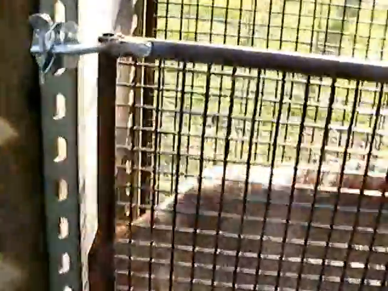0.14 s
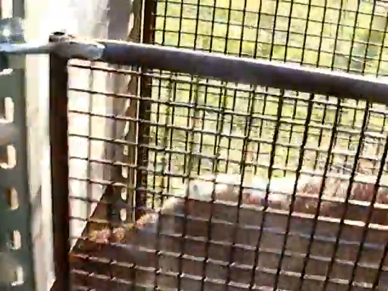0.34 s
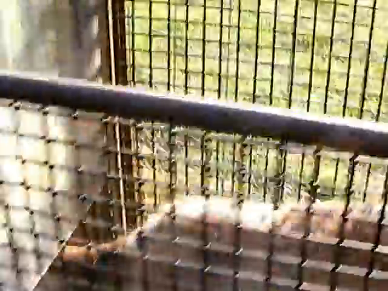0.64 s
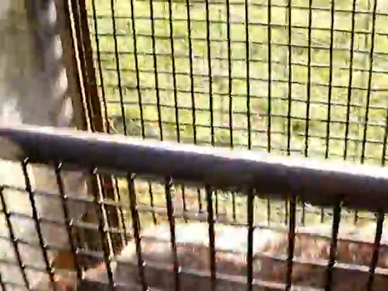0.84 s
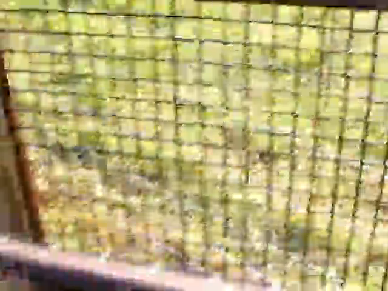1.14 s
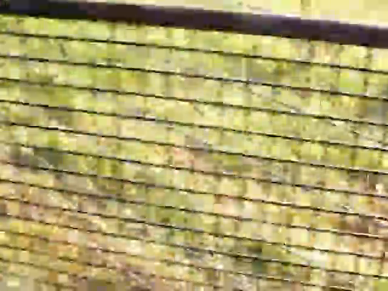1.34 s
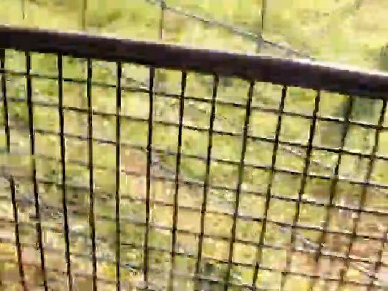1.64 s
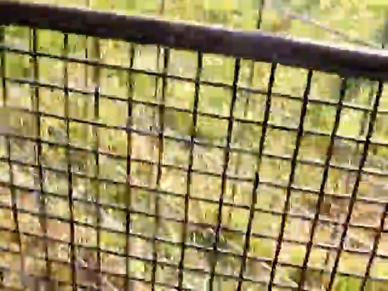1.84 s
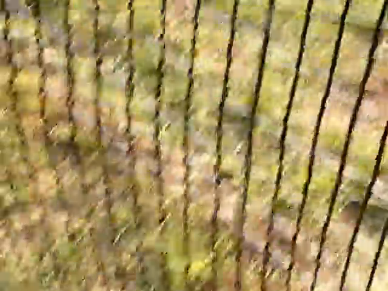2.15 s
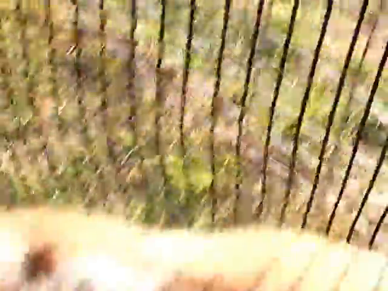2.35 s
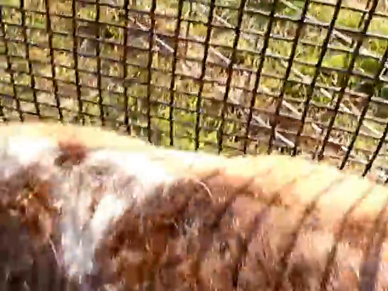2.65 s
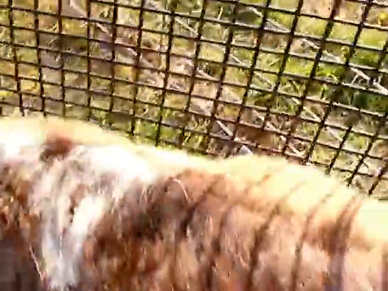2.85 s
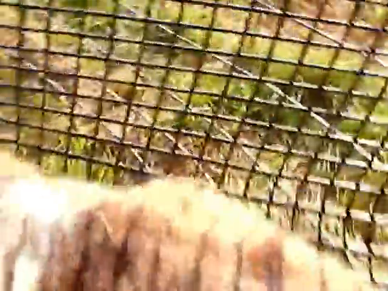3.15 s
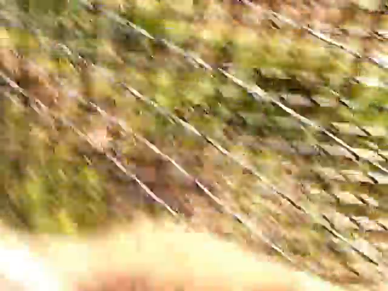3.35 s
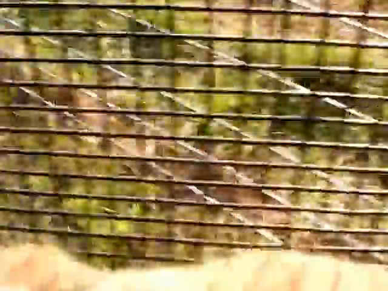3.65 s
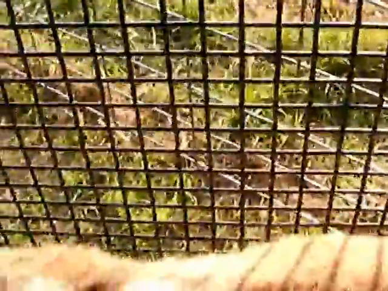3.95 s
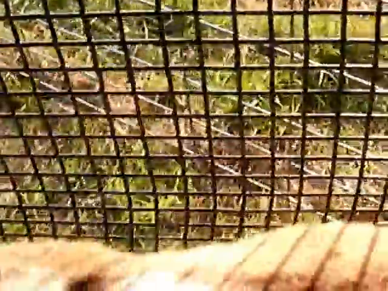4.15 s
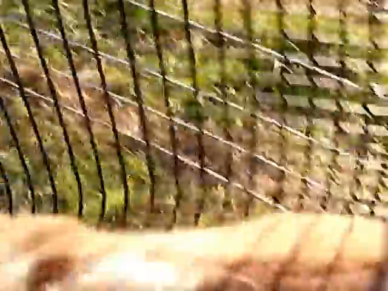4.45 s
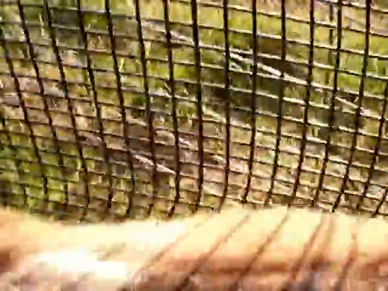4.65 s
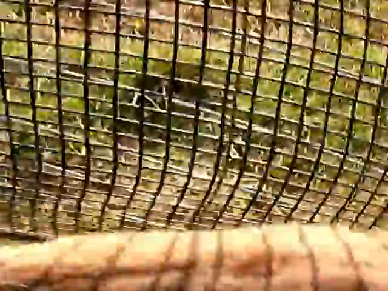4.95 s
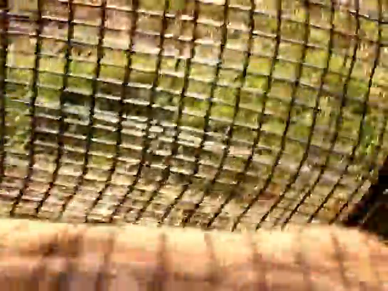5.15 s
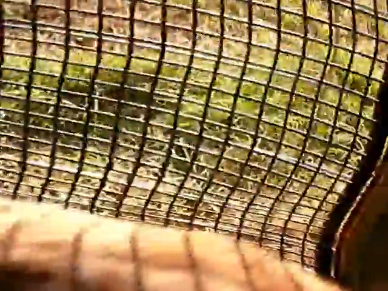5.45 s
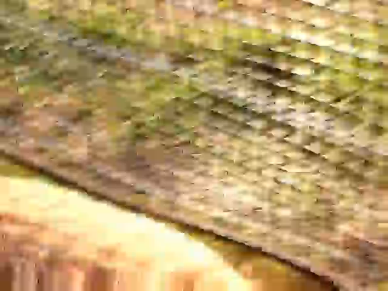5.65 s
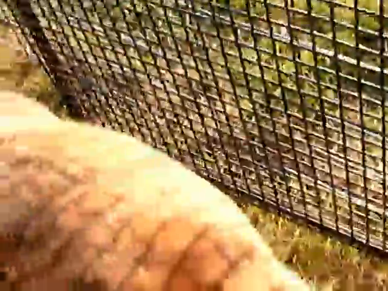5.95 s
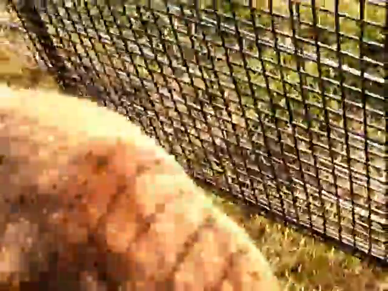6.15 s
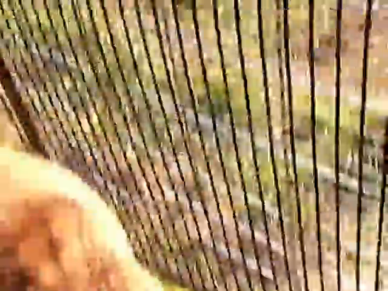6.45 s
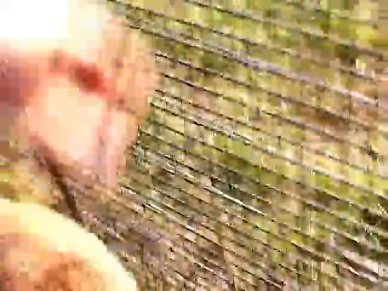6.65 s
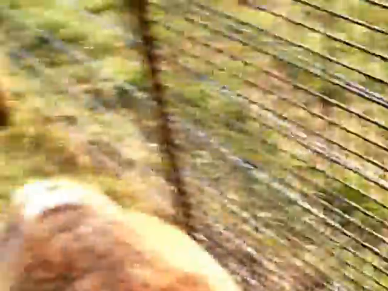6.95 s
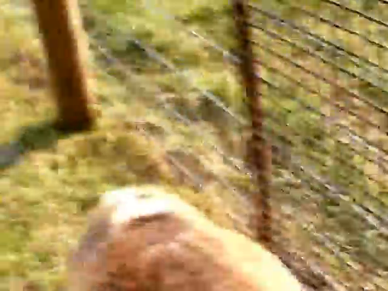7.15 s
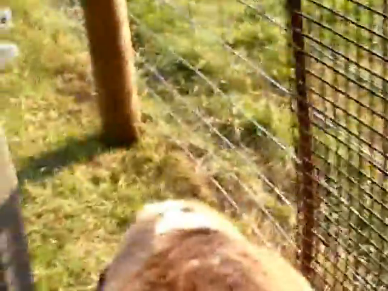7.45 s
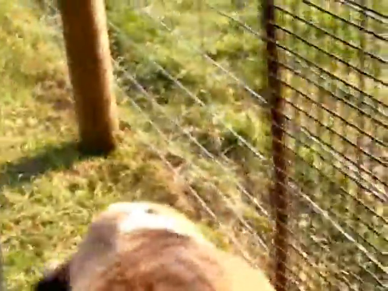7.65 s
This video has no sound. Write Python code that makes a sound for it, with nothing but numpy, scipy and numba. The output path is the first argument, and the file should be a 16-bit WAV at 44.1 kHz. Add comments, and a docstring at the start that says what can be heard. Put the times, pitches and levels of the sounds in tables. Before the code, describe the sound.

Very close to a phone held at the rail, a sheep shuffles past wire panels. Soft wool rubbing and low case rumble come first, with scuffs and one bright clank near one second. Dull knocks follow, then a dense burst of metallic rattling and jangling from three to four and a half seconds. Strong thumps come at 5.4 and 6.4 seconds, then it quietens to light brushing and a final rattle, over faint outdoor hush.

```python
"""A sheep shuffles along a wire-panel chute, close to a phone held at the rail.
From the start wool rubs the mesh and the phone's case rumbles, as shaped noise over a faint outdoor hush;
scuffs (swelling stick-slip clicks) and clanks (cracks with a decaying chatter) ring the panels.
Later come dull knocks, as two beating modes of the case, then wire pings, as sums of decaying sines.
Then a leaned-on panel drones as a wavering sine, and the mesh, pressed taut, jangles in its wires' tones."""
import sys
import numpy as np
from scipy import signal
from scipy.fft import rfft, irfft, next_fast_len
from scipy.io import wavfile
from scipy.ndimage import uniform_filter1d
from numba import njit

SR = 44100
rng = np.random.default_rng(int(sys.argv[2]) if len(sys.argv) > 2 else 0)


def unload_audio(sound):
    """Save the sound as a 16-bit wav file, at the path given as the first command line argument."""
    columns = np.transpose(np.atleast_2d(sound))
    # keep every value between -1 and 1, then stretch to whole-number steps
    steps = np.round(np.clip(columns, -1, 1) * 32767)
    wavfile.write(sys.argv[1], SR, steps.astype(np.int16))


N = 344065
TIME = np.arange(N) / SR

# the fleece rubbing along the mesh, relative levels: time_s, scrape_db, body_db
RUB_LEVELS = [(0.0, -52.5, -54), (0.67, -50, -53.5), (1.8, -49, -54.5), (2.2, -54.5, -50.5),
              (2.5, -48, -55.5), (2.89, -48, -50), (3.24, -48, -49), (3.39, -35, -37.5), (3.56, -45, -43),
              (3.8, -73, -54), (3.93, -35, -42), (4.26, -54, -38.5), (4.74, -44, -43.5), (5.24, -51, -45),
              (5.39, -48.5, -48), (5.63, -56, -51), (5.76, -75.5, -33.5), (6.02, -50, -46.5),
              (7.0, -50, -50), (7.49, -51.5, -49.5), (7.8, -53, -39.5)]
# spectrum of the phone's case, relative: frequency_hz, density_db
CASE_SPECTRUM = [(40, -14), (100, -30), (165, -1), (215, -0.5), (280, 0.5), (340, -17.5), (480, -11),
                 (900, -58)]
# phase by which the left microphone port leads: frequency_hz, lead_rad
PORT_LEAD = [(40, 3.5), (260, 1.12), (1900, 1.5), (4300, 1.74), (6800, 2), (10000, 4), (13300, 4.5)]


def undb(db):
    """Logarithmic level: decibels to amplitude gain."""
    return 10 ** (np.asarray(db) / 20)


def unit(x):
    """Normalisation of power: scale to rms 1."""
    return x / np.sqrt(np.mean(x ** 2))


def t60_decay(t, t60):
    """Exponential decay: the level falls 60 dB in t60 seconds."""
    return np.exp(-np.log(1000) * t / t60)


def curves(table):
    """Linear interpolation of a time table: each column at every sample."""
    s, *columns = np.transpose(table)
    return [np.interp(TIME, s, column) for column in columns]


def along(points, hz):
    """Interpolation of (frequency, value) points on a log-frequency axis."""
    at_hz, value = np.transpose(points)
    return np.interp(np.log(hz + 1), np.log(at_hz), value)


def filtered(x, response):
    """Linear filtering: multiply the spectrum by a complex gain that depends on frequency."""
    size = next_fast_len(x.shape[-1] + 4096)
    hz = np.fft.rfftfreq(size, 1 / SR)
    return irfft(rfft(x, size) * response(hz), size)[..., :x.shape[-1]]


def colour(x, points):
    """Spectral shaping by a gain of unit mean power, so that white sound keeps its power."""
    return filtered(x, lambda hz: unit(undb(along(points, hz))))


def resonance(hz, centre_hz, width_hz):
    """Damped resonance: complex gain of one mode, 1 at its centre."""
    damping = 1j * hz * width_hz
    return damping / (centre_hz ** 2 - hz ** 2 + damping)


def registers(hz, body_hz=1100, hiss_hz=7500):
    """Complementary bands: shares of body, scrape and hiss at each frequency, summing to 1."""
    body = 1 / (1 + (hz / body_hz) ** 4)
    hiss = 1 - 1 / (1 + (hz / hiss_hz) ** 8)
    return np.array([body, 1 - body - hiss, hiss])


def walk(rate):
    """Smoothed noise: a wander of spread 1 that takes `rate` new values a second."""
    k = int(SR / rate)
    steps = np.repeat(rng.standard_normal(N // k + 1), k)
    return unit(uniform_filter1d(steps, k)[:N])


def slips(size, rate, spread_db, smooth):
    """Stick-slip friction: sparse uneven clicks over a smooth hiss, along two paths; rms 1."""
    happens = rng.random(size) < rate / SR
    strength = undb(spread_db * np.minimum(rng.exponential(size=size), 4)) * happens
    clicks = unit(strength * rng.standard_normal((2, size)))
    return unit(clicks + smooth * rng.standard_normal((2, size)))


def add(track, s, sound):
    """Superposition: mix a sound into the track from time s."""
    start = int(s * SR)
    a, b = max(start, 0), min(start + sound.shape[-1], N)
    track[:, a:b] += sound[:, a - start:b - start]


def tint(x, body_db, hiss_db, ring_hz, ring_db, ring_q=13, patchy_db=2.5, patch_hz=160):
    """Local resonance: each spot struck has its own balance, brief ring and uneven colour."""
    grid = np.arange(0, SR / 2, patch_hz)
    favour_db = patchy_db * rng.standard_normal(len(grid))

    def response(hz):
        balance = undb([body_db, 0, hiss_db]) @ registers(hz)
        patches = unit(undb(np.interp(hz, grid, favour_db)))
        ring = undb(ring_db) * resonance(hz, ring_hz, ring_hz / ring_q)
        return balance * patches * (1 + ring)
    return filtered(x, response)


def fleece(scrape_gain_db=5, body_gain_db=15, catch_db=2.5):
    """Sustained friction: wool catches and lets go; hiss grows with the scrape and swells in brushes."""
    # light, airy brushes of wool, relative levels: peak_s, level_db, width_s (peak to 1/e)
    swishes = [(0.55, -44, 0.69), (1.8, -27, 0.034), (6.98, -31.5, 0.15)]
    scrape_db, body_db = curves(RUB_LEVELS)
    hiss = undb(-43 + 0.5 * (scrape_db + 48.5))  # -43 dB in a light rub of -48.5 dB, half as steep
    for s, db, width in swishes:
        hiss = hiss + undb(db) * np.exp(-((TIME - s) / width) ** 2)
    rub = slips(N, rate=1500, spread_db=4.0, smooth=1.22)
    catching_db = catch_db * walk(45)
    body_part, scrape_part, hiss_part = filtered(rub, lambda hz: registers(hz)[:, None])
    body = body_part * undb(body_db + body_gain_db + catching_db)
    scrape = scrape_part * undb(scrape_db + scrape_gain_db + catching_db)
    return body + scrape + hiss_part * hiss


def grip(gain_db=3, flutter_db=2.0):
    """Structure-borne sound: the hand-held case rumbles along with the body of the rubbing."""
    _, body_db = curves(RUB_LEVELS)
    rumble = colour(rng.standard_normal((2, N)), CASE_SPECTRUM)
    return rumble * undb(body_db + gain_db + flutter_db * walk(16))


def hush(level_db=-47, swell_db=2.5):
    """Broadband noise floor: open-air background and the hiss of the microphones."""
    # background spectrum, relative: frequency_hz, density_db
    spectrum = [(25, -7), (60, 4), (130, 16), (270, -18), (400, -3.5), (900, 7.5), (1600, -10.5),
                (2700, -15), (5000, -1), (8500, -33), (10000, 3.5), (10800, 8), (11600, -17), (13300, -26)]
    return colour(rng.standard_normal((2, N)), spectrum) * undb(level_db + swell_db * walk(1.34))


def scuffs(gain_db=1.85, body_db=4.5, catch_db=2.0, rise_share=0.77):
    """Stick-slip drag of wool and hooves: slips swell and die away, catching on wire after wire."""
    # relative levels, hiss against the usual colour: peak_s, level_db, t60_s, hiss_db, ring_hz, ring_db
    drags = [(0.167, -29.5, 0.11, 2, 1100, 12), (0.37, -34, 0.23, 2, 1040, 12),
             (0.465, -37.5, 0.5, -3, 1023, 15.5), (1.235, -39.5, 0.5, -0.5, 1150, 8),
             (1.459, -32.5, 0.081, -14, 1950, 6), (1.718, -26.5, 0.27, -8, 1040, 4),
             (1.843, -30.5, 0.22, -8, 2100, -5), (1.945, -34.5, 0.17, -3, 4550, -2),
             (2.629, -34.5, 0.18, -8, 2150, -6), (3.019, -20.5, 0.075, -9, 895, 10),
             (3.092, -34, 0.25, 4, 1940, -1), (4.06, -20.5, 0.09, -2.5, 3340, -7),
             (4.23, -27.5, 0.19, 10, 2720, 5), (4.298, -30.5, 0.11, -14, 1010, 17),
             (4.39, -30.5, 0.32, -19, 530, 19), (4.428, -20.5, 0.12, 0, 2400, -4),
             (4.609, -36, 0.57, -0.5, 538, 19), (4.92, -33.5, 0.33, -0.5, 710, 3),
             (5.29, -27.5, 0.3, -6.5, 900, 1), (5.61, -34, 0.28, -23, 1910, 9),
             (6.041, -33, 0.12, -4, 2600, 1), (6.37, -28.5, 0.18, -13, 440, 18),
             (6.63, -43.5, 0.46, -9, 745, 14), (7.215, -32, 0.15, -18, 1910, -15)]
    out, lead_s = np.zeros((2, N)), 0.2
    t = np.arange(3 * SR // 5) / SR - lead_s
    for s, db, t60, hiss_db, ring_hz, ring_db in drags:
        swell = t60_decay(np.maximum(-t / rise_share, t), t60)  # the rise takes a share of the fade
        drag = swell * slips(len(t), rate=2200, spread_db=2.0, smooth=0.94)
        add(out, s - lead_s, undb(db + gain_db) * tint(drag, body_db, hiss_db, ring_hz, ring_db))
    return out * undb(catch_db * walk(110))


def clanks(gain_db=0.2, crack_s=0.0011, brush_db=-11, brush_s=0.014, darken_hz=3100):
    """Impact with frequency-dependent damping: metal brushes, cracks, then chatters, treble dying first."""
    # loose panels striking their frames; body and hiss against the usual colour, crack against the chatter,
    # t60 ahead of the two damping factors below, relative levels:
    # strike_s, level_db, t60_s, body_db, hiss_db, crack_db, ring_hz, ring_db
    strikes = [(0.15, -30, 0.43, 4, -21, -6, 1710, 8.5), (0.947, -17, 0.13, -13, -8, 3, 4400, 4),
               (1.4697, -21.5, 0.04, 3.5, -22, 12, 2860, 4), (1.643, -37, 0.042, 19.5, -5, 3, 564, 0),
               (1.744, -19, 0.052, -1, -12, -9, 1660, 11), (2.047, -36, 0.076, 15, -6, 3, 2350, 0),
               (2.254, -31.5, 0.1, 8, -11, 1, 2980, 3), (2.437, -45, .015, -20, 10, 16, 4700, -14),
               (2.952, -23.5, 0.13, 7.5, -1.5, 5, 2100, -6), (3.2088, -15, 0.12, 4, -10.5, 2.5, 2400, 0),
               (3.295, -20, 0.19, 6, -7, -4, 1210, 4), (3.326, -13.5, 0.11, -1, 1.5, 0, 3930, -4),
               (3.347, -14.5, 0.12, 1.5, -14, 1, 800, 8.5), (3.759, -24.5, 0.26, -9, -2.5, -14, 5940, 4),
               (3.791, -22.5, 0.23, 7, -2, -5, 1880, 5), (3.817, -15.5, 0.15, -1.5, 0.5, 2, 3200, -3),
               (3.93, -16, 0.089, -16, 2, 2, 1620, -4), (4.014, -19.5, 0.16, 12, -4, -7, 470, 9),
               (4.129, -17.5, 0.13, -16, -5.5, -8, 4200, 2), (4.246, -19, 0.097, 7.5, -3, -4, 6200, 8),
               (4.346, -14.5, 0.15, -11, -1.5, -4, 4680, -7), (4.359, -18, 0.07, -9, -1, -2, 5660, 13),
               (4.465, -11.5, 0.062, -18, 5, 6, 4560, 9), (4.836, -34.5, 0.024, -8, -6, 2, 4130, 10),
               (5.043, -22.5, 0.2, 13.5, -6, 3, 466, 11), (5.089, -25, 0.43, 6, -6, -11, 537, 8),
               (5.165, -22.5, 0.29, 4.5, -10, -4, 1500, 5), (5.231, -20, 0.023, 0, -5.5, 4, 2200, -11),
               (5.394, -18.5, 0.036, 10.5, -21, 11.5, 1400, 3), (5.579, -27.5, 0.66, 9, -2.5, -17, 860, 3),
               (5.7177, -15.5, 0.17, 1.5, 0.5, 8, 1320, 7), (5.742, -20, 0.3, 4, -5.5, 1, 980, 2),
               (5.877, -24, 0.044, 15, -7, 3.5, 2760, 8), (6.2164, -30.5, 0.22, 1, -7, -13, 2400, -3),
               (6.281, -18, 0.13, -3.5, 0, 5, 4350, -6), (6.331, -25, 0.31, 3, -4, -12, 5000, -8),
               (6.437, -13.5, 0.035, 5, -8, 6.5, 2260, 1), (6.4455, -20.5, 0.075, 0, -15, 8.5, 3670, 12),
               (7.541, -33.5, 0.1, 10, -8, 5.5, 2000, 6), (7.591, -19.5, 0.21, 8.5, -13, -9, 905, 0),
               (7.753, -26.5, 0.13, 9.5, -14, -1, 2280, -1)]
    dull_lasts, bright_lasts = 1.254, 0.71  # factors on t60 below and above darken_hz
    out, lead_s = np.zeros((2, N)), 0.04
    t = np.arange(SR // 4) / SR - lead_s
    after = np.maximum(t, 0)
    brush = undb(brush_db) * np.exp(-abs(t) / brush_s)
    for s, db, t60, body_db, hiss_db, crack_db, ring_hz, ring_db in strikes:
        dull_fade = np.where(t < 0, brush, t60_decay(after, t60 * dull_lasts))
        bright_fade = np.where(t < 0, brush, t60_decay(after, t60 * bright_lasts))
        chatter = slips(len(t), rate=1800, spread_db=2.0, smooth=0.8)
        dull = filtered(chatter, lambda hz: 1 / (1 + (hz / darken_hz) ** 4))
        crack_fade = undb(crack_db) * (t >= 0) * np.exp(-after / crack_s)
        crack = crack_fade * rng.standard_normal((2, len(t)))
        blow = dull * dull_fade + (chatter - dull) * bright_fade + crack
        add(out, s - lead_s, undb(db + gain_db) * tint(blow, body_db, hiss_db, ring_hz, ring_db))
    return out


def mesh(contact, ring_db=-4, t60=0.057, taut_s=4.04, taut_width_s=0.38):
    """Sympathetic resonance: wires jangle at each contact, most while the mesh is pressed taut."""
    # pitches of the mesh wires: pitch_hz
    wire_hz = [2391, 3530, 4260, 4410, 4720, 5490, 5780, 6138, 6280, 9400, 11400]
    t = np.arange(SR // 8) / SR
    phases = 2 * np.pi * rng.random((2, len(wire_hz), 1))
    tones = np.sin(2 * np.pi * np.outer(wire_hz, t) + phases).sum(axis=1)
    wires = unit(tones * t60_decay(t, t60)) / np.sqrt(len(t))
    taut = np.exp(-((TIME - taut_s) / taut_width_s) ** 4)  # flat-topped press
    share = 0.12 + 0.6 * taut
    jangle = signal.oaconvolve(contact * share, wires, axes=1)[:, :N]
    return contact * np.sqrt(1 - share ** 2 / 2) + undb(ring_db) * jangle


def panel(contact, ring_db=-2, scatter_db=-10, scatter_t60=0.12):
    """Modal response and scattering: contacts ring the frame tubes and scatter among wires and rails."""
    # ringing of the frame tubes, relative levels: frequency_hz, level_db, t60_s
    modes = [(527.6, 4.5, 0.26), (706, 8, 0.29), (823, -0.5, 0.49), (1881, 1, 0.33)]
    # usual colour of a contact, relative: frequency_hz, density_db
    spectrum = [(60, -29.5), (150, 0), (260, 4), (380, -9), (700, -4), (1200, -3), (1700, 2), (2400, 3),
                (4000, -1), (6500, -6.5), (8000, -9), (9500, -1), (13300, -5)]

    def ringing(hz):
        return sum(undb(db + ring_db) * resonance(hz, mode_hz, np.log(1000) / np.pi / t60)
                   for mode_hz, db, t60 in modes)
    rings = filtered(contact, ringing)
    t = np.arange(SR // 4) / SR
    echoes = unit(rng.standard_normal((2, len(t))) * t60_decay(t, scatter_t60)) / np.sqrt(len(t))
    scatter = signal.fftconvolve(contact, echoes, axes=1)[:, :N]
    return colour(contact + rings + undb(scatter_db) * scatter, spectrum)


def ports(paths, likeness):
    """Partial coherence: two microphone ports share some sound; left leads, right is fuller in the bass."""
    # left minus right: frequency_hz, difference_db
    port_balance = [(40, -5), (120, -2.5), (250, -10.5), (500, -5.5), (1000, -4.5), (2000, -5), (4000, 1),
                    (12000, -0.2)]
    left = filtered(paths[0], lambda hz: np.exp(1j * along(PORT_LEAD, hz)))
    right = likeness * paths[0] + np.sqrt(1 - likeness ** 2) * paths[1]

    def balance(hz):
        ratio = undb(along(port_balance, hz))
        return np.array([ratio, np.ones_like(hz)]) * np.sqrt(2 / (1 + ratio ** 2))
    return filtered(np.array([left, right]), balance)


def knocks(beat_hz=33, decay_s=0.027, thud_db=-11, thud_hz=430, thud_s=0.0046,
           shake_db=-19, shake_s=0.041, lead_rad=1.0):
    """Beating of two close case modes, which start opposed and swell, with a brief thud and a shake."""
    # dull knocks that reach the case; pitch is the strength-weighted mean of the two modes, relative levels:
    # start_s, level_db, pitch_hz, second_mode_strength (0-1)
    blows = [(1.471, -4.5, 268.7, 0.7), (1.758, -23, 265, 0.9), (1.803, -18.5, 283.6, 1),
             (2.067, -22, 277, 0.48), (2.243, -11, 266, 0.36), (2.925, -12.5, 245.6, 0.95),
             (2.951, -15.5, 264, 0.7), (3.026, -12, 255, 0.08), (4.281, -13.5, 277, .8),
             (5.041, -15, 283, 0.84), (5.231, -23, 256.5, 0.9), (5.395, 5.5, 282, 0.32),
             (5.876, -6, 297.4, 0.47), (6.026, -23, 284, 1), (6.279, -15, 274, 0.7),
             (6.449, 0, 273.4, 0.43), (6.895, -20, 273, 0.4), (7.743, -16.5, 249.7, 1)]
    out, t = np.zeros((2, N)), np.arange(SR // 5) / SR
    soft_contact = 1 - np.exp(-t / 0.0035)
    for s, db, hz, share in blows:
        heaviness = np.clip((db - 1.5) / 6, 0, 1)  # from 1.5 to 7.5 dB
        left_db = -12.5 + 5 * heaviness  # left minus right: heavy knocks reach the ports more alike
        lower = np.exp(-2j * np.pi * beat_hz * t * share / (1 + share))
        upper = share * np.exp(2j * np.pi * beat_hz * t / (1 + share))
        fade_s = decay_s * (1 + share) / 2  # a lone mode dies sooner
        ring = (lower - upper) * np.exp(2j * np.pi * hz * t - t / fade_s)
        thud = undb(thud_db) * np.exp(2j * np.pi * thud_hz * t - t / thud_s)
        tone = ring / abs(ring).max() + thud
        noise = colour(rng.standard_normal((2, len(t))), CASE_SPECTRUM)
        shake = undb(shake_db) * np.exp(-t / shake_s) * noise
        pair = (np.array([tone * np.exp(1j * lead_rad), tone]).imag + shake) * soft_contact
        add(out, s, undb([[db + left_db], [db]]) * pair)
    return out


def pings(gain_db=-3, scatter_db=0.5, detune=0.013, buzz_db=1, buzz_s=0.016):
    """Modal synthesis: a wire snaps free, each time tuned a little apart, and buzzes on its neighbours."""
    # single wires snapping free, relative levels: start_s, level_db
    snaps = [(1.942, -28.5), (3.93, -20.5), (4.13, -18), (4.347, -27), (4.4654, -16), (5.719, -26)]
    # ringing of a plucked wire, relative levels: frequency_hz, level_db, t60_s
    modes = [(3490, -11, 0.1), (4200, -6, 0.058), (4385, 4, 0.029), (4730, -2, 0.037), (5200, -2, 0.038),
             (6200, -6.5, 0.052)]
    out, t = np.zeros((2, N)), np.arange(SR // 5) / SR
    hz, mode_db, t60 = np.transpose(modes)[:, :, None]
    for s, db in snaps:
        tuned_hz = hz * (1 + detune * rng.standard_normal(hz.shape))
        rings = np.exp((2j * np.pi * tuned_hz - np.log(1000) / t60) * t)
        mix = undb(db + gain_db + mode_db.T + scatter_db * rng.standard_normal((2, len(hz))))
        phases = np.exp(2j * np.pi * rng.random(mix.shape))
        ring = (mix * phases @ rings).imag
        # convolving with a noise burst roughens the ring
        buzz = unit(rng.standard_normal((2, len(t))) * np.exp(-t / buzz_s)) / np.sqrt(len(t))
        add(out, s, ring + undb(buzz_db) * signal.fftconvolve(ring, buzz, axes=1)[:, :len(t)])
    return out


def drone(pitch_hz=202, waver=0.01875, flutter_db=2.5, gain_db=-3, left_db=-10,
          shudder_db=-17, shudder_hz=120, shudder_width_hz=35, attack_s=0.0056, release_s=0.062):
    """Bowed-like oscillation: wool sustains the panel's lowest mode; the frame shudders below it."""
    # the sheep leaning on a panel, relative levels: start_s, length_s, level_db
    leans = [(3.433, 0.2, -24.5), (3.756, 0.29, -36), (4.02, 0.2, -36.5), (4.264, 0.17, -28.5),
             (5.046, 0.061, -25), (6.87, 0.38, -40)]
    leaning = np.zeros(N)
    for s, length, db in leans:
        attack = np.clip((TIME - s) / attack_s, 0, 1)
        release = np.exp(-np.maximum(TIME - s - length, 0) / release_s)
        leaning += undb(db) * attack * release
    phase = 2 * np.pi * np.cumsum(pitch_hz * (1 + waver * walk(25))) / SR
    left = undb(left_db) * np.sin(phase + along(PORT_LEAD, pitch_hz))
    pair = np.array([left, np.sin(phase)])
    noise = rng.standard_normal((2, N))
    shudder = unit(filtered(noise, lambda hz: resonance(hz, shudder_hz, shudder_width_hz) ** 2))
    return (2 * pair + undb(shudder_db) * shudder) * leaning * undb(gain_db + flutter_db * walk(20))


def scene():
    """Superposition of the chute, the phone's case and the background at the two ports."""
    chute = panel(fleece() + mesh(scuffs() + clanks()))
    at_ports = ports(chute + grip() + hush(), likeness=0.51)
    return at_ports + knocks() + pings() + drone()


@njit
def follow(x, fall):
    """Peak detection: rises at once, falls by a factor each sample."""
    out, e = np.empty(len(x)), 0.
    for i in range(len(x)):
        e = max(x[i], e * fall)
        out[i] = e
    return out


def record(dry, notch_hz=7900, notch_width_hz=1200, top_hz=13600):
    """Filtering and compression: the phone notches treble, thins deep bass, ducks, rounds peaks, cuts the top."""
    edges = notch_hz - notch_width_hz / 2, notch_hz + notch_width_hz / 2
    x = signal.sosfilt(signal.butter(2, edges, "bandstop", fs=SR, output="sos"), dry)
    x = signal.sosfilt(signal.butter(2, 50, "high", fs=SR, output="sos"), x)
    ceiling, attack_s, release_s = 0.4, 0.003, 0.17
    loudness = uniform_filter1d(abs(x).max(axis=0), size=129)  # averaging weakens brief cracks
    held = follow(loudness, np.exp(-1 / (release_s * SR)))
    lag = np.exp(-1 / (attack_s * SR))
    cut = signal.lfilter([1 - lag], [1, -lag], 1 - ceiling / np.maximum(held, ceiling))
    rounded = np.tanh(x * (1 - cut))
    return signal.sosfilt(signal.ellip(10, 0.2, 70, top_hz, fs=SR, output="sos"), rounded)


dry = scene()
out = record(dry)
unload_audio(out)
```